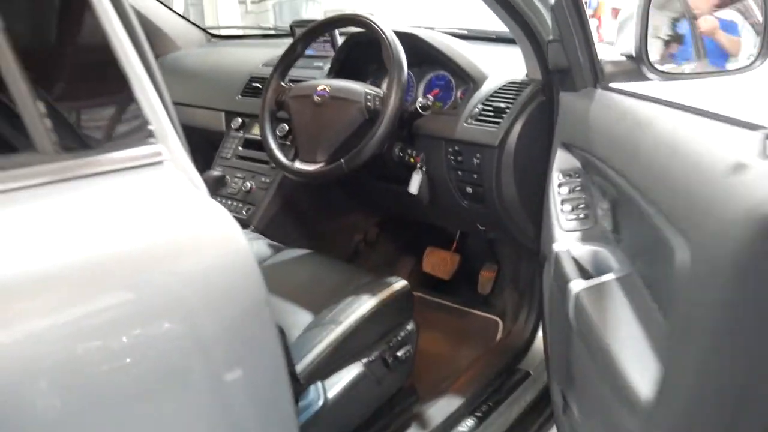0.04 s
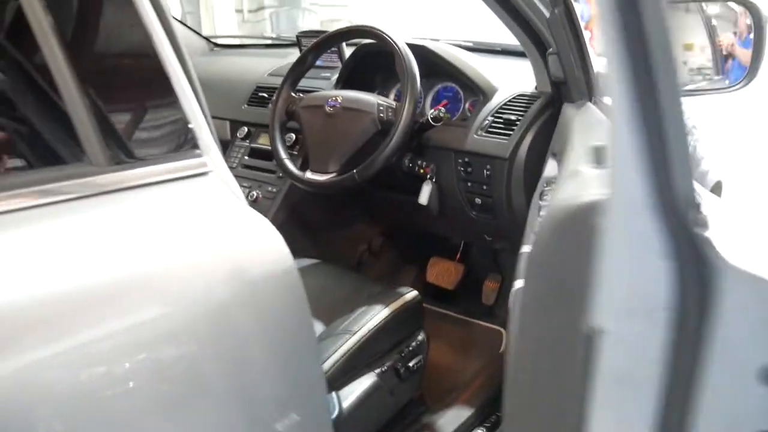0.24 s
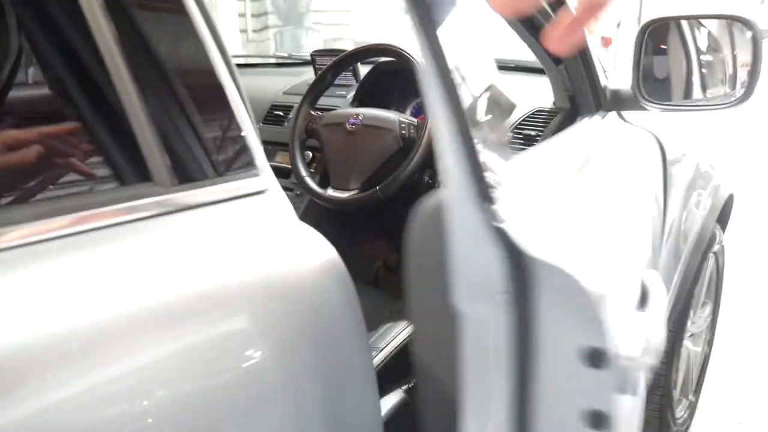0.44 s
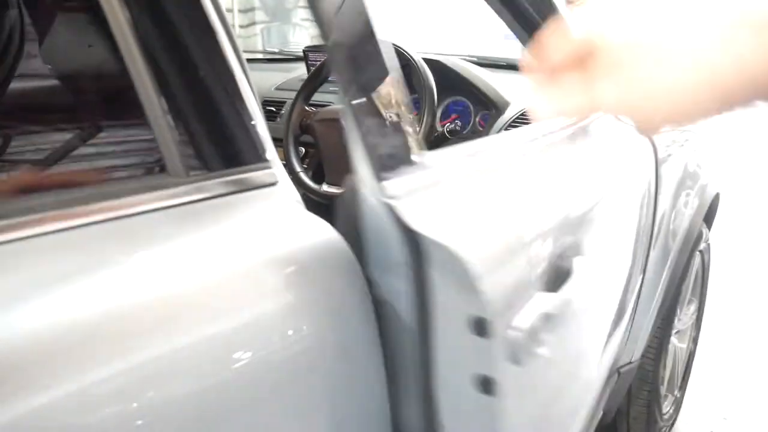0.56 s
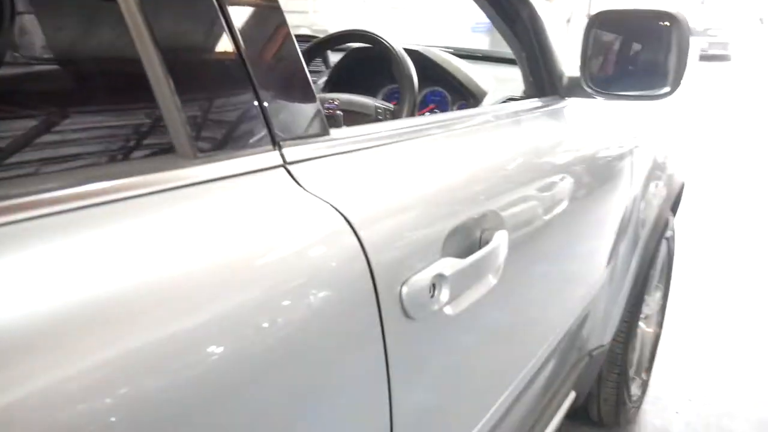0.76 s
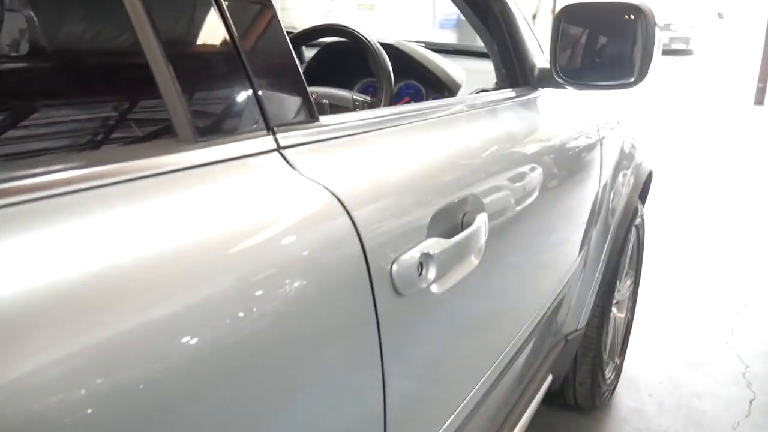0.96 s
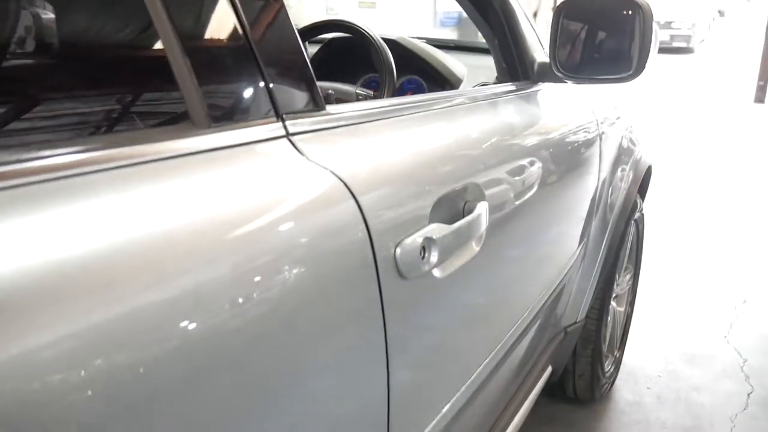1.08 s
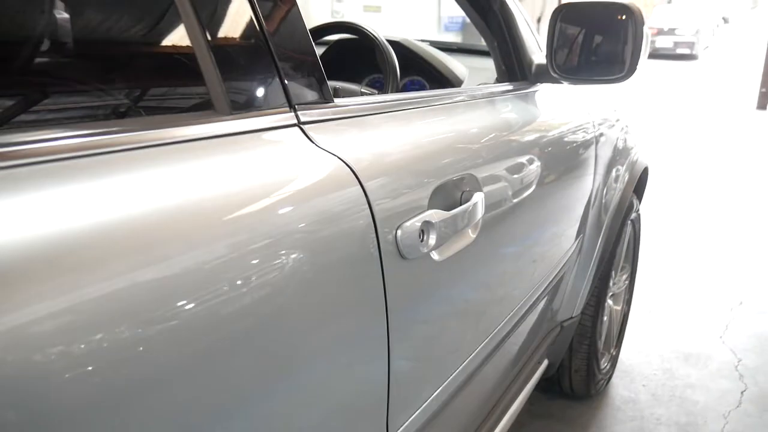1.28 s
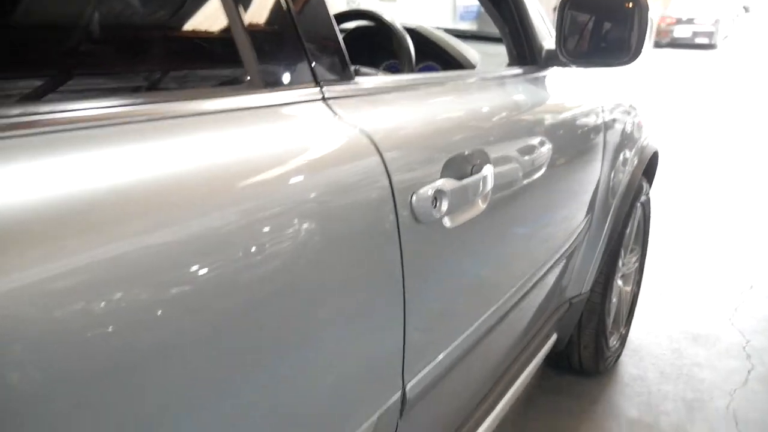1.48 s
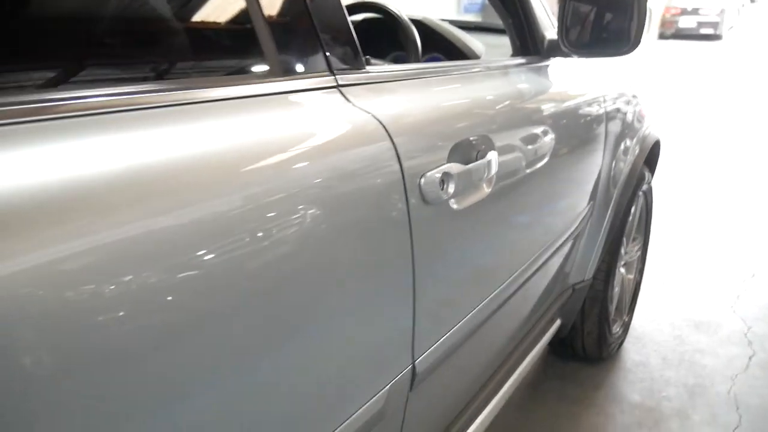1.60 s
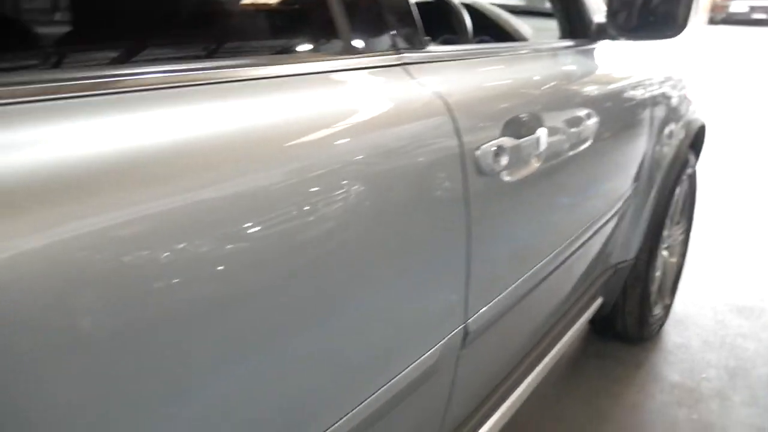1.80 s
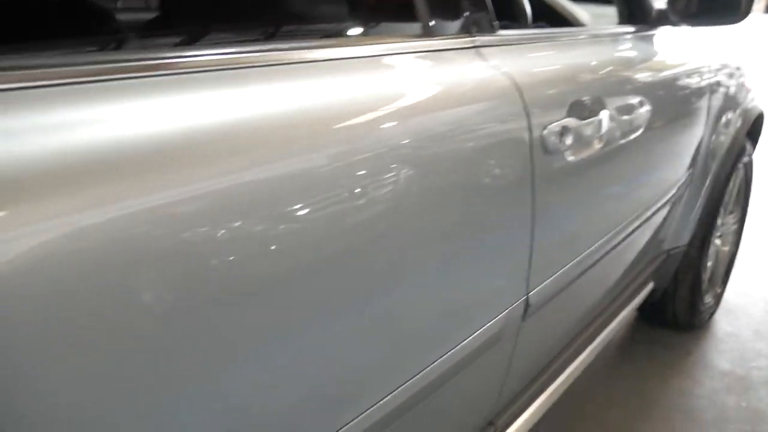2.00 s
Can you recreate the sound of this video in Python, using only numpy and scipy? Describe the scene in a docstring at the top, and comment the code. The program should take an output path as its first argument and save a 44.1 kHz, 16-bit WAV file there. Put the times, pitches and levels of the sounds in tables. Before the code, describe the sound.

A car door swings shut with one heavy, boomy slam and metallic latch rattle in a large hall

```python
"""A car door swings shut in a large hard hall, close to a small mono microphone: metal contacts of latch and frame
strike and rattle through the door skin's resonances, low damped sines make the boom, shaped noise is the hall's answer.
Around it: a faint wavering hinge whine, a strap squeak and ring, bright bursts and trim chatter of short resonant noise.
Hall rumble and hiss, rustling, a low stir and a gust are coloured noise; a few ticks and one bump on the microphone housing."""
import sys
import numpy as np
from scipy import signal
from scipy.fft import rfft, irfft, next_fast_len
from scipy.io import wavfile
from scipy.ndimage import map_coordinates

SR = 44100
rng = np.random.default_rng(int(sys.argv[2]) if len(sys.argv) > 2 else 0)


def dump_mix(stems):
    """Bounce the given channels to the path in sys.argv[1] as a 16-bit WAV at rate SR."""
    frames = np.atleast_2d(stems).T  # one column per channel
    limited = np.clip(frames, -1, 1)  # hard clip at full scale
    pcm = np.round(limited * 32767).astype(np.int16)
    wavfile.write(sys.argv[1], SR, pcm)


def elevation(decibels):
    """Turn decibel levels (scalar or array-like) into linear amplitude ratios."""
    levels = np.asarray(decibels, float)
    return 10 ** (levels / 20)


N = 89964


def unit(x):
    """Scale to rms 1."""
    return x / np.sqrt(np.mean(x ** 2) + 1e-20)


def along(points, hz):
    """Interpolate (f/Hz, value) points on a log frequency axis."""
    f, v = np.transpose(points)
    return np.interp(np.log(hz + 1), np.log(f + 1), v)


def curves(rows):
    """One value per sample for each column after the time."""
    s, *cols = np.transpose(rows)
    return [np.interp(np.arange(N) / SR, s, c) for c in cols]


def wobble(rate_hz):
    """Smooth random curve, rate_hz knots a second."""
    knots = rng.standard_normal(int(N * rate_hz / SR) + 4)
    return map_coordinates(knots, [np.arange(N) * rate_hz / SR])


def filtered(x, response):
    """Apply a complex response of frequency to x by zero-padded FFT."""
    m = next_fast_len(len(x) + 8192)
    return irfft(rfft(x, m) * response(np.fft.rfftfreq(m, 1 / SR)), m)[:len(x)]


def rush(spectrum):
    """Coloured noise of rms 1."""
    return unit(filtered(rng.standard_normal(N), lambda f: elevation(along(spectrum, f))))


def add(track, s, x):
    """Mix x into track at time s."""
    part = track[round(s * SR):][:len(x)]
    part += x[:len(part)]


def resonance(f, hz, width_hz):
    """One causal resonance, gain 1 at its centre."""
    return 1j * f * width_hz / (hz * hz - f * f + 1j * f * width_hz)


def ring(modes, rise_s):
    """Damped sines that start together under a soft onset."""
    t = np.arange(SR // 2) / SR
    tones = sum(elevation(db - 60 * t / t60) * np.sin(2 * np.pi * hz * t) for hz, db, t60 in modes)
    return tones * (1 - np.exp(-t / rise_s))


def bursts(rows):
    """Decaying noise through a squared resonance and a 7 kHz two-pole low-pass, scaled to peak."""
    out, t = np.zeros(N), np.arange(SR // 8) / SR
    for s, peak_db, hz, width_hz, t60 in rows:
        noise = rng.standard_normal(len(t)) * elevation(-60 * t / t60)
        burst = filtered(noise, lambda f: resonance(f, hz, width_hz) ** 2 / (1 + 1j * f / 7000) ** 2)
        add(out, s, elevation(peak_db) * burst / np.abs(burst).max())
    return out


def hall_noise():
    """Hall rumble and hiss: coloured noise, level nearly steady."""
    # relative spectrum: f/Hz, density/dB
    floor = [(12, -25), (25, -6.5), (70, -1.5), (110, -9.5), (170, -9.5), (330, -20.5), (600, -24.5),
             (1000, -26), (1600, -22.5), (2400, -25), (3100, -29.5), (3700, -22), (4600, -32),
             (6500, -36.5), (9000, -42.5), (12000, -46.5), (15000, -53), (16000, -72)]
    return elevation(-48.5 + 0.96 * wobble(7.34)) * rush(floor)


def rustling():
    """Rustle: coloured noise under a level curve with fast random flutter."""
    # level: t/s, level/dB
    rustle = [(.0, -53), (.08, -70), (.25, -64), (.33, -49), (.5, -51), (.7, -53), (1.22, -55), (1.3, -51),
              (1.37, -52.5), (1.42, -57.5), (1.6, -67.5)]
    # relative spectrum: f/Hz, level/dB
    rustle_colour = [(600, 1.5), (1500, -3.5), (2600, -1.5), (3300, 0.5), (4000, 3.5), (4800, -1.5),
                     (6000, -9), (8000, -14.5), (15000, -34.5), (16000, -60)]
    return elevation(curves(rustle)[0] + 1.07 * wobble(40.87)) * rush(rustle_colour)


def low_stir():
    """Moving air and shuffling: low coloured noise, slowly unsteady."""
    # level: t/s, level/dB
    stir = [(0, -80), (.17, -67.5), (.22, -54.5), (.45, -54.5), (.64, -50.5), (.7, -51), (1.2, -55.5),
            (1.32, -53.5), (1.43, -60), (1.6, -73.5), (2.04, -60)]
    # relative spectrum: f/Hz, level/dB
    stir_colour = [(15, -17), (40, -8), (100, -11), (300, -1), (800, -19.5), (2000, -20), (4000, -76)]
    return elevation(curves(stir)[0] + 3.6 * wobble(12.0)) * rush(stir_colour)


def gust():
    """Air pushed past the microphone by the swinging door: very low noise."""
    # level: t/s, level/dB
    gust_level = [(0, -77), (.2, -68), (.28, -43.5), (.36, -52.5), (.45, -47), (.62, -46.5), (.68, -83),
                  (2.04, -78)]
    # relative spectrum: f/Hz, level/dB
    gust_colour = [(15, 0), (35, -8.5), (70, -12.5), (130, -14), (300, -82)]
    return elevation(curves(gust_level)[0]) * rush(gust_colour)


def ticks():
    """Short bright ticks."""
    # t/s, peak/dB, f/Hz, width/Hz, t60/s
    tick_rows = [(1.164, -39, 3270, 1600, .03), (1.175, -37.5, 4100, 1800, 0.022),
                 (1.8878, -40, 3600, 1500, .03), (1.8878, -48, 6900, 1500, .006),
                 (1.9559, -34.5, 3180, 3220, 0.011)]
    return bursts(tick_rows)


def housing_bump():
    """Bump on the microphone housing: low-passed negative snap, then damped housing modes."""
    # f/Hz, level before onset/dB, t60/s
    housing = [(77.6, -29, 0.081), (318, -41, 0.024), (1400, -28, 0.014)]
    bump_s = 1.9568
    out, t = np.zeros(N), np.arange(SR // 8) / SR
    snap = elevation(-27 - 60 * t / 0.0064)
    add(out, bump_s, -filtered(snap, lambda f: 1 / (1 + 1j * f / 3500) ** 3))
    add(out, bump_s + 0.00075, ring(housing, 0.00082))
    return out


def rough_tone(rows):
    """Sine on (t/s, f/Hz, level/dB) rows, faded at both ends; random pitch and level make it rough."""
    waver, jitter = .006, .016  # relative pitch deviation, slow and fast
    start, end = (0.027, rows[0][1], -120), (.75, rows[-1][1], -120)
    hz, db = curves([start, *rows, end])
    level = elevation(db + 2.5 * wobble(22) + 3 * wobble(120))
    hz = hz * (1 + waver * wobble(30) + jitter * wobble(250))
    return level * np.sin(2 * np.pi * np.cumsum(hz) / SR)


def hinge():
    """Faint broken whine that rises as the door speeds up."""
    # t/s, f/Hz, level/dB
    whine = [(.235, 600, -67), (.275, 630, -46), (.3, 645, -56.5), (.345, 742, -73), (.39, 804, -52),
             (.43, 840, -66), (.48, 875, -58), (.54, 890, -53.5), (.58, 895, -72)]
    return rough_tone(whine)


def check_strap():
    """Check strap squeaks, then lets go and rings in damped modes."""
    # t/s, f/Hz, level/dB
    squeak = [(0.141, 1540, -84), (0.166, 1560, -54.5), (.19, 1620, -55), (.205, 1520, -80)]
    # f/Hz, level before onset/dB, t60/s
    strap = [(225, -45.5, .15), (520, -46, 0.16), (807, -51, 0.23)]
    out = rough_tone(squeak)
    add(out, 0.2034, ring(strap, 0.007))
    return out


def bright_bursts():
    """Short bright 3.65 kHz bursts, around the slam and again later."""
    # t/s, peak/dB
    bright_rows = [(0.767, -26), (.7845, -29), (.794, -32), (.858, -45), (.876, -39), (.929, -42),
                   (1.1515, -33), (1.17, -41), (1.18, -40.5), (1.199, -42)]
    hz, width_hz, t60_s = 3650, 550, .015
    return bursts([(s, db, hz, width_hz, t60_s) for s, db in bright_rows])


def trim_chatter():
    """Loose trim: random short bursts, denser at first, levels falling with time."""
    start_s, start_db, t60_s, count = .79, -33, .75, 110
    late, pitch, size = rng.random((count, 3)).T
    late_s = .3 * late ** 1.5
    hz = 350 * 10 ** pitch
    peak_db = start_db - 60 * late_s / t60_s - 8 * size
    return bursts([(start_s + s, db, f, f / 2, .01) for s, db, f in zip(late_s, peak_db, hz)])


def hall(x):
    """Hall's answer: convolution with grainy noise, each frequency dying at its own speed."""
    # decay: f/Hz, t60/s
    hall_decay = [(50, 0.11), (150, 1.09), (280, 0.83), (600, 0.56), (1500, 0.89), (3000, 0.98),
                  (6000, 0.64), (12000, 0.72)]
    # relative spectrum: f/Hz, level/dB
    hall_colour = [(40, 1), (100, -12), (200, -5), (340, 4.5), (600, 1), (1000, 5), (1500, 5.5), (2600, 5),
                   (3700, 0.5), (6000, -1), (15000, -2.5)]
    delay_s, rise_s, grain_db = .006, .025, 2.5
    hz, t, z = signal.stft(rng.standard_normal(SR), SR, nperseg=512)
    decay = elevation(-60 * t / along(hall_decay, hz)[:, None])
    tail = signal.istft(z * decay, SR, nperseg=512)[1]
    tail = tail * (1 - np.exp(-np.arange(len(tail)) / SR / rise_s))
    tail = tail * elevation(grain_db * wobble(121.3)[:len(tail)])
    tail = filtered(tail / np.linalg.norm(tail), lambda f: elevation(along(hall_colour, f)))
    return signal.fftconvolve(np.pad(x, (round(delay_s * SR), 0)), tail)[:N]


def boom():
    """Low thumps of the closing door, then weaker later thumps and an echo: damped sines with a soft onset."""
    # t/s, level before onset/dB, f/Hz, t60/s, sign (+1 or -1)
    thumps = [(.755, -16.5, 60, .35, 1), (.778, -1.5, 126, .095, 1), (.7815, -9, 110, .04, -1),
              (.8005, -7.5, 80, .07, -1), (.862, -14, 98, .11, -1), (.92, -25, 65, .1, 1),
              (.965, -25, 90, .1, 1), (1.045, -35, 85, .15, 1), (.756, -14, 170, .06, 1),
              (.79, -14, 200, .08, 1), (.8235, -15, 58, .12, 1), (.83, -14, 140, .05, 1)]
    out = np.zeros(N)
    for s, db, hz, t60, sign in thumps:
        add(out, s, np.sign(sign) * ring([(hz, db, t60)], .003))
    return out


def latch(blur):
    """Metal contacts: strike plus decaying rattle through door skin modes and a flat crack; blur widens the modes."""
    # latch and frame: t/s, relative level/dB, rattle t60/s, treble tilt/(dB/octave above knee),
    # bass tilt/(dB/octave, 100 Hz to 1 kHz, positive thins the bass)
    contacts = [(0.199, -51.5, 0.58, -21, 1.5), (0.7239, -24.5, 0.096, -29, 5.5),
                (0.7431, -37, 0.029, -9, -3), (0.7467, -22.5, 0.06, -6, -5.5),
                (0.751, -28.5, 0.055, -17, -8.5), (0.7602, -29.5, 0.076, -14, -8.5),
                (0.7656, -26, 0.09, -11.5, -2), (.776, -29, 0.098, -25, -7),
                (.785, -31.5, 0.034, -24, -8.5), (.797, -38, 0.21, -18, -1)]
    # door skin modes: f/Hz, width at blur 1/Hz, level at blur 1/dB
    skin_modes = [(223, 80, -3.5), (394, 81, 1.5), (471, 67, 6), (573, 142, 2.5), (680, 105, 4),
                  (910, 122, -1), (1030, 84, -1.5), (1540, 310, -2), (2420, 1640, -11.5),
                  (3840, 540, -26.5)]
    crack_db, impact_db, gain_db, knee_hz = -23, 13, 16.5, 3900
    lead = 256  # samples of room for the zero-phase tilt ahead of the strike
    out, t = np.zeros(N), np.arange(SR // 8) / SR

    def skin(f):
        modes = sum((-1) ** k * elevation(db) * resonance(f, hz, width_hz * blur)
                    for k, (hz, width_hz, db) in enumerate(skin_modes))
        return elevation(crack_db) + modes / np.sqrt(blur)

    for s, db, t60, treble_db, bass_db in contacts:
        def tilt(f):
            treble = treble_db * np.log2(np.maximum(f / knee_hz, 1))
            bass = bass_db * np.log2(np.clip(f / 1000, .1, 1))
            return elevation(treble + bass)

        rattle = rng.standard_normal(len(t)) * elevation(-60 * t / t60)
        strike = elevation(impact_db) * (t == 0)
        hit = np.concatenate([np.zeros(lead), rattle + strike])
        add(out, s - lead / SR, elevation(db + gain_db) * filtered(hit, lambda f: skin(f) * tilt(f)))
    return out


def scene():
    """One microphone feeds both channels; the hall gets its own draw of the latch, with broader modes."""
    thud = boom()
    answer = elevation(-5.5) * hall(latch(4) + elevation(-4) * thud)
    background = hall_noise() + rustling() + low_stir() + gust()
    small = ticks() + housing_bump() + check_strap() + bright_bursts() + trim_chatter()
    mix = latch(1.0) + thud + answer + hinge() + background + small
    return np.tile(mix, (2, 1))


def roll_off(x):
    """The treble ends steeply here."""
    return signal.sosfilt(signal.butter(12, 15760, fs=SR, output="sos"), x)


def record(dry):
    """Soft clipping, a faint random-phase side signal, hiss drawn per channel, band limit."""
    # side signal: f/Hz, side over mid/dB
    unlike = [(30, -28), (200, -61), (600, -43), (1500, -24), (3000, -22.5), (6000, -18), (10000, -11),
              (15000, -13)]
    # relative hiss spectrum: f/Hz, level/dB
    hiss_colour = [(100, 11), (8000, 2.5), (15000, -3.5), (16000, -28)]
    clip_top, clip_hard, hiss_db, top_hz = .66, 5, -68.5, 15760
    x = dry / (1 + np.abs(dry / clip_top) ** clip_hard) ** (1 / clip_hard)
    hz, _, z = signal.stft(x[0], SR, nperseg=512)
    phase = np.exp(2j * np.pi * rng.random(z.shape))
    side = signal.istft(z * elevation(along(unlike, hz))[:, None] * phase, SR, nperseg=512)[1][:N]
    hiss = elevation(hiss_db) * np.array([rush(hiss_colour), rush(hiss_colour)])
    x = x + np.array([side, -side]) + hiss
    mix = np.array([filtered(c, lambda f: f < top_hz) for c in x])
    return roll_off(mix)


dry = scene()
out = record(dry)
dump_mix(out)
```